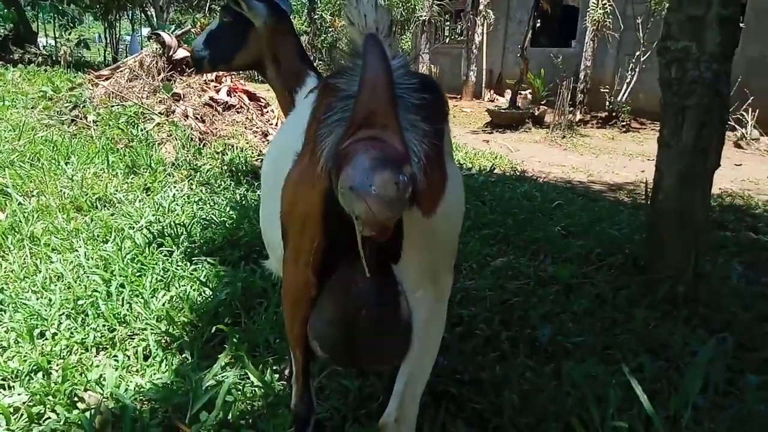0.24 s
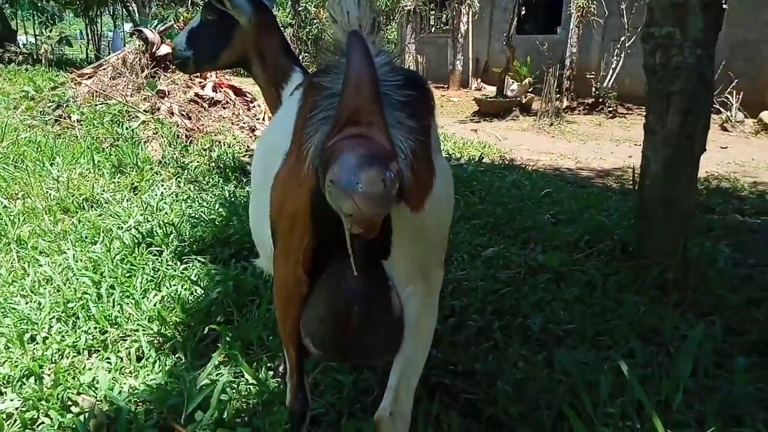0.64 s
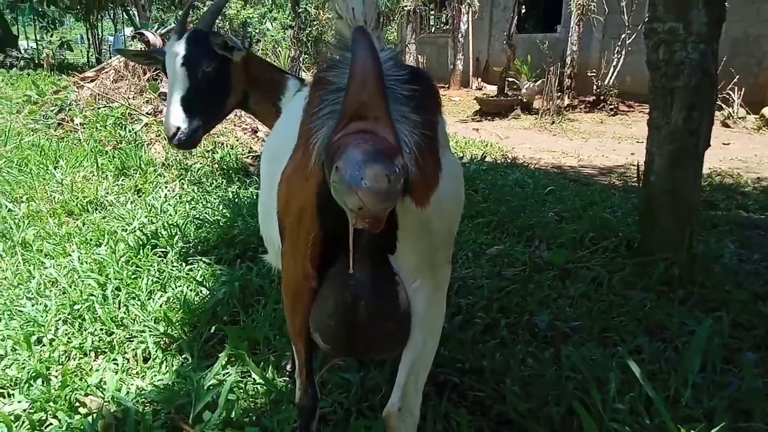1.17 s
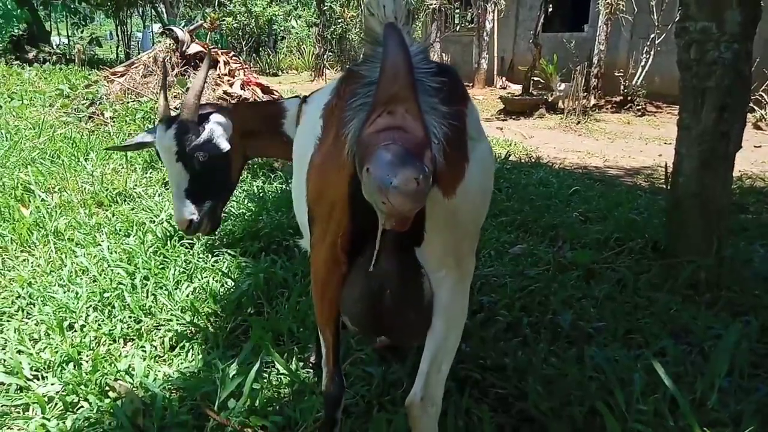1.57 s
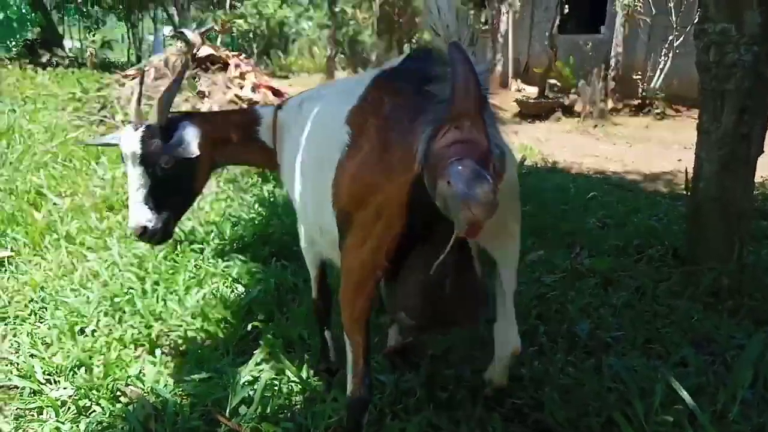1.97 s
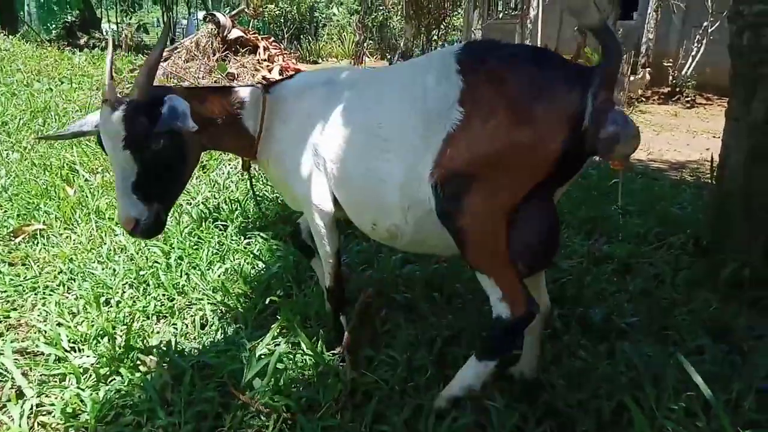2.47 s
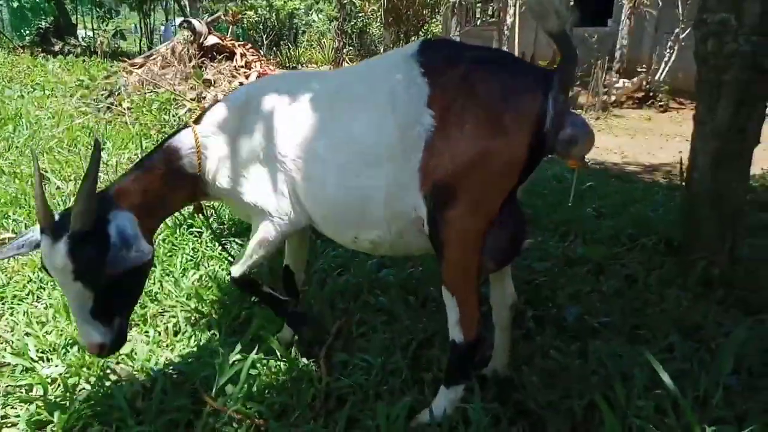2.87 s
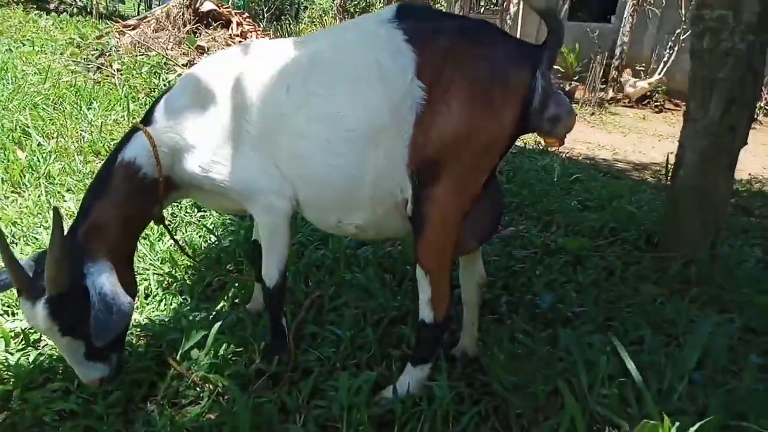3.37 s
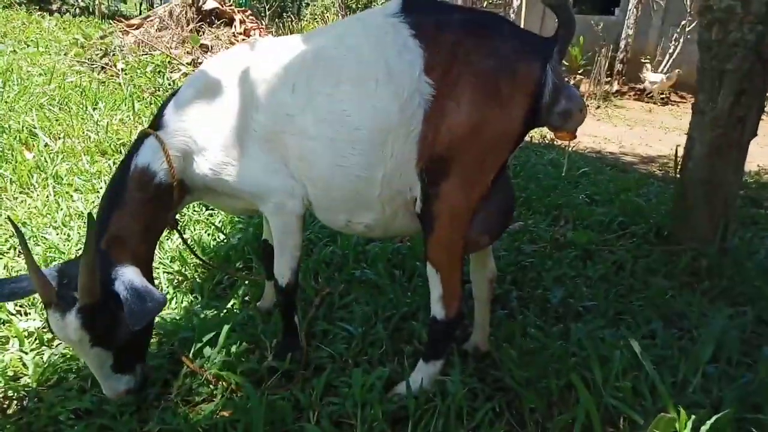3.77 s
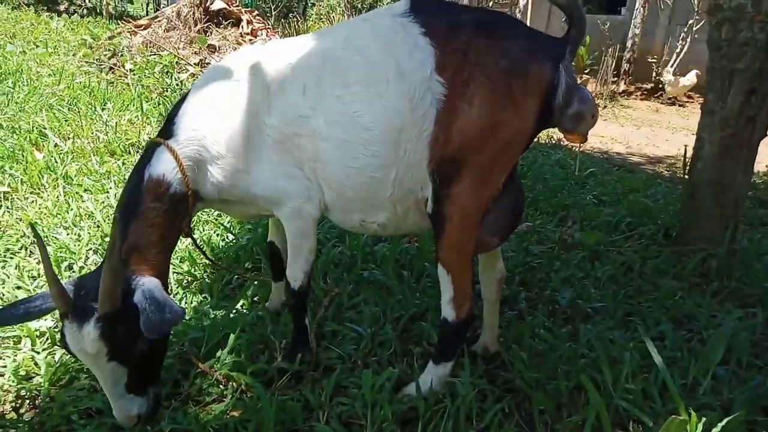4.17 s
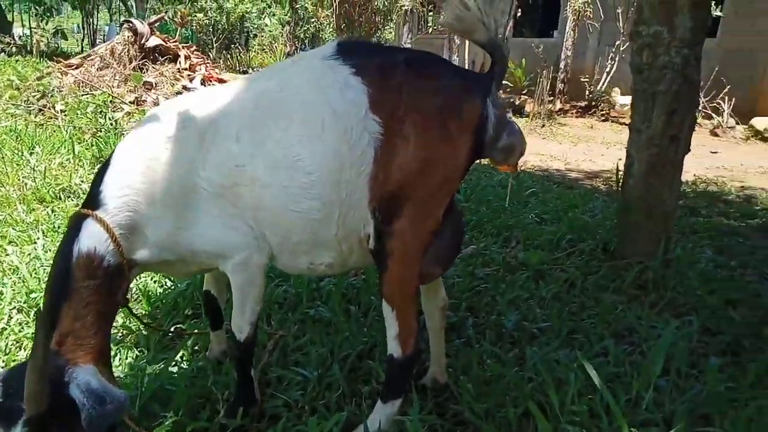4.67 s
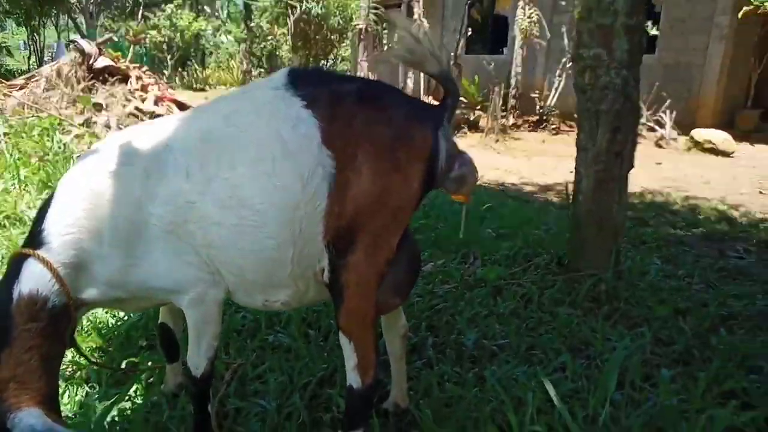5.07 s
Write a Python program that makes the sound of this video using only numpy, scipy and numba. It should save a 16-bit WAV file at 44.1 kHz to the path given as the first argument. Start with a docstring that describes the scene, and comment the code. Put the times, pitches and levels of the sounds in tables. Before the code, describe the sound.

Close to the microphone, a goat bleats loudly open-mouthed, later more muffled and nasal, amid small birdsong and light rustling grass.

```python
"""A soft outdoor rush opens the scene, in a grassy yard with trees; shaped noise and a faint sine drone.
Turf thuds and grass swishes, swells of shaped noise, come as a goat steps and noses about.
Small birds whistle in gliding sines, heard mostly as scatter from the trees.
The goat bleats twice: first with its mouth wide open, then starting from a nasal hum. Pulses and
turbulence drive its throat in about ten throbs a second, with the voice sagging and rasping between."""
import sys
import numpy as np
from scipy import signal
from scipy.fft import rfft, irfft, next_fast_len
from scipy.io import wavfile
from scipy.ndimage import uniform_filter1d, map_coordinates
from numba import njit

SR = 44100
rng = np.random.default_rng(int(sys.argv[2]) if len(sys.argv) > 2 else 0)


def store_pcm(level_fs):
    """Save levels as 16-bit WAV."""
    pcm = np.round(np.clip(level_fs, -1, 1) * 32767).astype(np.int16)
    wavfile.write(sys.argv[1], SR, np.atleast_2d(pcm).T)


N = 235405  # length [samples]


def amp(db):
    """Decibels to an amplitude factor."""
    return 10 ** (np.asarray(db) / 20)


def unit(x):
    """x scaled to rms 1."""
    return x / np.sqrt(np.mean(x ** 2) + 1e-20)


def clock():
    """The time of every sample [s]."""
    return np.arange(N) / SR


def curves(rows):
    """One value per sample for each column after the time."""
    times, *columns = np.transpose(rows)
    times = np.maximum.accumulate(times)
    return [np.interp(clock(), times, column) for column in columns]


def smooth(x, seconds):
    """A rounded running mean: two box averages in a row."""
    size = max(int(seconds * SR), 1)
    return uniform_filter1d(uniform_filter1d(x, size), size)


def wobble(rate):
    """A smooth random curve, rate knots a second."""
    t = np.arange(0, N + 16, 16) / SR
    knots = rng.standard_normal(int(N * rate / SR) + 4)
    return np.interp(clock(), t, map_coordinates(knots, [t * rate]))


def coloured(x, points):
    """x through a spectrum of (frequency [Hz], gain [dB]) points, joined on a log frequency axis."""
    size = next_fast_len(N + 8192)
    hz, db = np.transpose(points)
    log_bins = np.log(np.fft.rfftfreq(size, 1 / SR) + 1)
    gain = amp(np.interp(log_bins, np.log(hz), db))
    return irfft(rfft(x, size) * gain, size)[:N]


def noise(points):
    """Coloured noise of rms 1."""
    return unit(coloured(rng.standard_normal(N), points))


def swell(s, rise, fall):
    """A bell-shaped swell that peaks at 1 at time s."""
    i = np.arange(max(int((s - 5 * rise) * SR), 0), min(int((s + 5 * fall) * SR), N))
    t = i / SR - s
    bell = np.zeros(N)
    bell[i] = np.exp(-.5 * (t / np.where(t < 0, rise, fall)) ** 2)
    return bell


@njit
def two_pole(x, tuning, damping):
    """A band-pass whose tuning and damping move sample by sample."""
    y, a, b = np.zeros(len(x)), 0., 0.
    for i in range(len(x)):
        g = tuning[i]
        band = (a + g * (x[i] - b)) / (1 + g * (g + damping[i]))
        a, b = 2 * band - a, b + 2 * g * band
        y[i] = band * damping[i]
    return y


def formant(x, hz, width):
    """One resonance, with gain 1 at its centre."""
    centre = hz * np.ones(N)
    return two_pole(x, np.tan(np.pi * centre / SR), width / centre)


def hollow(x, hz, width, depth):
    """An antiresonance: a side cavity swallows one band."""
    return x - np.clip(depth, 0, 1) * formant(x, hz, width)


def echoes(x, t60):
    """Diffuse scatter from walls and trees: a decaying noise tail of unit energy."""
    t = np.arange(SR) / SR
    tail = rng.standard_normal(SR) * amp(-60 * t / t60) * (1 - np.exp(-t / 0.0049))
    return signal.fftconvolve(x, tail / np.linalg.norm(tail))[:N]


def between(pair, share):
    """From the first value of a pair to the second."""
    return pair[0] + share * (pair[1] - pair[0])


# spectrum of the outdoor rush: (frequency [Hz], relative level [dB])
RUSH_SPECTRUM = [(200, -4.5), (450, -12.5), (620, -9.5), (900, -1), (1800, 1), (2900, -3.5), (3900, -4),
                 (4550, -13), (5100, -26.5), (7500, -27), (9500, -40.5), (15000, -53)]
# spectrum of the low air: (frequency [Hz], relative level [dB])
MURMUR_SPECTRUM = [(22, -41), (45, -16.5), (75, -3.5), (130, -0.5), (260, -0.5), (320, -4.5), (420, -18.5),
                   (1500, -72.5)]
# faint drone, before its wavering: (time [s], level [dB])
DRONE_LEVEL = [(0, -65), (.6, -52.5), (1.0, -52.5), (2.3, -56.5), (2.7, -59), (3.3, -56), (4.0, -66.5),
               (5.34, -60)]
RUSH_DB, MURMUR_DB = -53.5, -55  # middle levels of the outdoor air


def surroundings():
    """All around the microphone: a rush, a murmur of air and a mid band in noise, and a wavering sine drone."""
    rush = amp(RUSH_DB + 0.39 * wobble(2.3)) * noise(RUSH_SPECTRUM)
    murmur = amp(MURMUR_DB + 2.2 * wobble(5.7)) * noise(MURMUR_SPECTRUM)
    drone_hz = 100 + 5 * wobble(9.1)
    drone_level = amp(curves(DRONE_LEVEL)[0] + 2.8 * wobble(3.7))
    drone = drone_level * np.sin(2 * np.pi * np.cumsum(drone_hz) / SR)
    middle_level = amp(-66.5 + 2.5 * wobble(4.2))  # comes and goes
    middle = middle_level * noise([(400, -40.5), (600, 5), (850, 5.0), (1200, -35.5)])
    return rush + middle + murmur + drone


# swishes of grass: (time [s], half length [s], stem level [dB], crisp blades over the stems [dB])
GRASS_SWISHES = [(0.471, 0.011, -57.5, 6.5), (0.528, .13, -55.5, -5), (2.265, 0.0023, -47, -25),
                 (2.339, 0.27, -51.5, -7.5), (2.832, 0.0025, -46, -10), (3.09, 0.064, -80, 17),
                 (3.525, 0.041, -53, -15), (3.747, 0.023, -63.5, 0), (4.79, 0.039, -44.5, -17),
                 (5.166, 0.052, -48, -29)]
# spectrum of the stems: (frequency [Hz], relative level [dB])
STEM_SPECTRUM = [(100, -17), (500, 2), (900, 1.5), (3000, 4), (4300, -2), (5500, -38), (15000, -47.5)]
# spectrum of the dry blades: (frequency [Hz], relative level [dB])
BLADE_SPECTRUM = [(1000, -25), (4000, 7.5), (6500, 3.5), (9000, -10.5), (11000, -19), (15000, -11)]
# soft thuds on the turf: (time [s], half length [s], level [dB])
TURF_THUDS = [(0.137, 0.014, -47), (0.477, 0.054, -50), (1.149, 0.012, -46), (1.428, 0.014, -45.5),
              (3.058, 0.041, -45), (3.525, 0.015, -51), (4.08, 0.023, -50)]
# spectrum of the turf: (frequency [Hz], relative level [dB])
TURF_SPECTRUM = [(25, -11), (70, 16.5), (170, 4.5), (280, -10), (450, -40), (2000, -58.5)]


def grass(grain_db=3):
    """At ground level: stems swish, dry blades crackle in grainy noise, and the turf thuds softly."""
    stems = sum(amp(db) * swell(s, half, half) for s, half, db, _ in GRASS_SWISHES)
    blades = sum(amp(db + crisp_db) * swell(s, half, half) for s, half, db, crisp_db in GRASS_SWISHES)
    thuds = sum(amp(db) * swell(s, half, half) for s, half, db in TURF_THUDS)
    swish = stems * noise(STEM_SPECTRUM)
    crackle = blades * unit(noise(BLADE_SPECTRUM) * amp(grain_db * wobble(400)))
    return swish + crackle + thuds * noise(TURF_SPECTRUM)


# a songbird's repeated phrase, before scatter:
# (time into the phrase [s], length [s], start [Hz], end [Hz], relative level [dB])
BIRD_PHRASE = [(0, 0.089, 3892, 4010, -49), (0.064, 0.07, 3616, 3720, -46), (0.104, .08, 4680, 5030, -52),
               (.165, .085, 6100, 6653, -61)]
# single whistles, before scatter: (time [s], length [s], start [Hz], end [Hz], relative level [dB])
BIRD_WHISTLES = [(.634, 0.082, 6400, 6240, -62), (2.35, .06, 3480, 2953, -46),
                 (2.721, 0.059, 4510, 4550, -51.5), (2.779, 0.16, 4990, 5170, -53.5),
                 (2.992, 0.19, 7150, 6560, -56.5), (3.203, 0.22, 4460, 5450, -58.5),
                 (3.37, 0.074, 5710, 6830, -54), (3.725, 0.034, 7455, 4477, -46.5),
                 (4.927, .14, 1688, 1750, -48.5), (5.107, 0.16, 1828, 1973, -46)]
PHRASE_START_S, PHRASE_EVERY_S = 3.485, .292
PHRASE_FADE_DB = 0.86  # each repeat is set a little fainter


def bird_notes(count=6):
    """The single whistles, and the phrase repeated at an even pace."""
    notes = list(BIRD_WHISTLES)
    for k in range(count):
        start = PHRASE_START_S + k * PHRASE_EVERY_S
        for s, length, start_hz, end_hz, db in BIRD_PHRASE:
            notes.append((start + s, length, start_hz, end_hz, db - k * PHRASE_FADE_DB))
    return notes


def birds(waver=0.0095):
    """Up in the trees: thin trembling whistles, gliding sines heard mostly as scatter."""
    song, drift = np.zeros(N), 1 + waver * wobble(420)
    for s, length, start_hz, end_hz, db in bird_notes():
        i = np.arange(int(s * SR), min(int((s + length) * SR), N))
        u = np.linspace(0, 1, len(i))
        hz = (start_hz + (end_hz - start_hz) * np.sin(np.pi / 2 * u)) * drift[i]
        # no two notes are quite alike, in pitch or level
        hz = hz * (1 + .005 * rng.standard_normal())
        level = amp(db + 1.5 * rng.standard_normal())
        envelope = np.sqrt(np.abs(np.sin(np.pi * u)))
        song[i] += level * envelope * np.sin(2 * np.pi * np.cumsum(hz) / SR)
    song *= 1 + 0.71 * wobble(560)  # a fast flutter widens each note
    # distance dulls the highest notes
    song = coloured(song, [(1800, 0.28), (4000, -0.017), (5000, -0.51), (7000, -1.5)])
    return 0.76 * song + 0.95 * echoes(song, t60=0.15) + 0.75 * echoes(song, t60=0.79)


# closed-mouth grunts at the edges of the bleats: (time [s], half length [s], pitch [Hz], rms level [dB])
NASAL_GRUNTS = [(2.076, 0.0065, 230, -40), (4.043, 0.0067, 189, -39), (4.561, 0.0067, 228, -29.5)]


def grunts():
    """With the lips shut, little more than the fundamental gets out through the nose: swelling sines."""
    total = np.zeros(N)
    for s, half, hz, db in NASAL_GRUNTS:
        tone = np.sqrt(2) * np.sin(2 * np.pi * hz * (clock() - s))
        total += amp(db) * swell(s, half, half) * tone
    return total


# courses of the wide-open bleat and of the one that starts as a nasal hum: (time [s], pitch before bends [Hz],
# first formant as the mouth opens [Hz], level held between throbs, before catches [dB])
WIDE_COURSE = [(1.298, 220, 285, -47.5), (1.355, 283, 381, -32), (1.385, 297.5, 502, -54.5),
               (1.43, 304.3, 615, -33), (1.475, 322.1, 689.8, -29.5), (1.57, 309.5, 846.2, -29.5),
               (1.73, 317.8, 822, -24), (1.84, 298.6, 860, -28), (1.93, 294.6, 843.3, -25.5),
               (2.0, 268.6, 740, -30), (2.07, 233, 684, -46.5)]
HUM_COURSE = [(4.072, 204.7, 227, -46), (4.125, 243.7, 278, -44), (4.201, 283.7, 311, -44.5),
              (4.299, 299.1, 329.6, -27), (4.329, 296.7, 572.8, -38.5), (4.388, 286.6, 598, -45),
              (4.489, 278, 639.4, -24.5), (4.547, 282.6, 613.4, -38.5)]
EDGE_DB_PER_S = 1299  # how fast the held voice starts and stops


def course():
    """Pitch, first formant and held level; the held voice dies away outside each bleat."""
    pitch, first_hz, held_db = curves(WIDE_COURSE + HUM_COURSE)
    t = clock()
    distances = [np.abs(t - np.clip(t, rows[0][0], rows[-1][0])) for rows in (WIDE_COURSE, HUM_COURSE)]
    outside = np.min(distances, axis=0)  # time to the nearer bleat [s]
    return pitch, first_hz, amp(held_db - EDGE_DB_PER_S * outside)


def opening(first_hz):
    """How wide the mouth is, 0-1, told from the first formant."""
    return np.clip((first_hz - 600) / 220, 0, 1)


# throbs of both bleats: (peak time [s], peak level [dB], rise [s], lead of the pitch crest [s],
# base roughness [0-1], upper formants, before brightness [dB], nasal ring, before brightness [dB])
BLEAT_THROBS = [(1.334, -32, 0.016, 0.041, .14, -10, -13.5), (1.464, -22, 0.013, 0.054, 0.19, -6.5, -11),
                (1.553, -12.5, 0.016, 0.036, 0.55, -3, 6), (1.644, -11.5, 0.017, .031, 0.18, -9, 0),
                (1.74, -13.5, 0.016, 0.03, 0.34, -4, 1.5), (1.836, -14.5, .014, 0.028, 0.17, 0.5, -7.5),
                (1.922, -22.5, 0.014, 0.035, 0.31, 3, -5.5), (4.103, -25, 0.008, 0.026, .2, -21, -22),
                (4.21, -22.5, 0.019, .039, 0.22, -16, -15), (4.303, -26, 0.015, .043, 0.39, -19.5, -16.5),
                (4.398, -15.5, 0.019, .042, 0.57, -11.5, -12), (4.501, -19, 0.019, 0.037, 0.31, -12.5, -17)]
FALL_S, RELEASE_S, SAG_S = 0.0098, .019, 0.037  # after a throb's peak: decay, pitch lifts, pitch lowest
PRESS_S = .023  # from the pitch crest down to the pressed tone
RELEASE_LIFT = .025  # share of the pitch
CREST_LIFT, SAG_DROP = (0.11, .06), (0.00564, .15)  # shares of the pitch: (lips close, mouth wide)
CATCH_S, CATCH_DB = 0.023, 8  # the held voice catches just after a throb: delay, depth of the dip


def larynx():
    """Pitch, roughness and strength: each throb crests, settles under pressure, lets go and sags into a rasp."""
    pitch, first_hz, held = course()
    knots, push = [], np.zeros(N)
    for s, db, rise, lead, rough, _, _ in BLEAT_THROBS:
        push += amp(db) * swell(s, rise, FALL_S)
        held = held * amp(-CATCH_DB * swell(s + CATCH_S, 0.0024, 0.005))
        wide = opening(first_hz[int((s + SAG_S) * SR)])
        crest, sag = between(CREST_LIFT, wide), -between(SAG_DROP, wide)
        # (time [s], pitch bend [share], roughness)
        knots += [
            (s - lead - .008, crest, 0.87 * rough),
            (s - lead, crest, 0.17 * rough),
            (s - lead + PRESS_S, 0, 0.11 * rough),
            (s + 0.00718, 0.51 * RELEASE_LIFT, rough),
            (s + RELEASE_S, RELEASE_LIFT, 2.5 * rough),
            (s + SAG_S - .006, .85 * sag, rough),
            (s + SAG_S + 0.0027, sag, 1.41 * rough)]
    bend, rough = curves(knots)
    rough = rough + 0.43 * swell(WIDE_COURSE[-1][0], 0.092, 0.051)  # the long bleat runs out in a rasp
    return smooth(pitch * (1 + bend), 0.0017), np.clip(rough, 0, 1), np.hypot(push, held)


def folds(pitch, rough, jitter=0.01956, rasp=0.97, shimmer_db=2):
    """One pulse per cycle; rough folds no longer snap shut: the sharp edge gives way to turbulence."""
    phase = 2 * np.pi * np.cumsum(pitch * (1 + jitter * rough * wobble(330))) / SR
    order = 50  # harmonics in the pulse
    pulses = unit(np.sin((order + .5) * phase) / (2 * np.sin(phase / 2) + 1e-12) - .5)
    edge = coloured(pulses, [(900, -47.0), (1700, -32.5), (3000, 7.5)])
    pulses = pulses - np.clip(0.43 * rough, 0, 1) * edge
    breath = noise([(100, -13.5), (500, 4.0), (1200, -2.5), (3000, 6.0), (15000, -10.0)])
    turbulence = unit((1 + 1.75 * np.cos(phase)) * breath)
    return pulses * amp(shimmer_db * rough * wobble(290)) + rasp * rough * turbulence


def smear(x):
    """Reflections inside the throat delay some bands, which spreads each pulse over its cycle."""
    for hz, width in [(1500, 370), (2700, 460), (3900, 230)]:
        x = x - 2 * formant(x, hz, width)
    return x


# slow drift of the throat: (time [s], second formant [Hz], nasal ring [Hz], brightness [dB],
# hiss level at full voice strength [dB])
THROAT_DRIFT = [(1.33, 883, 3480, -1.5, -51), (1.45, 1780, 3710, -1.5, -43), (1.63, 1800, 3800, 2, -37.5),
                (1.76, 1670, 3830, 0, -42), (1.86, 1600, 4020, 4, -42), (2.05, 1490, 3660, -8.5, -51),
                (4.1, 1408, 3630, -6, -48.5), (4.18, 1311, 3602, 1, -41), (4.29, 1380, 3707, 3.5, -40.5),
                (4.37, 1575, 3640, -0.5, -46), (4.55, 1474, 3650, 4.5, -41.5)]
SLACK_UPPER_DB, SLACK_RING_DB = (0, -2), (4, -2.5)  # between throbs: (lips close, mouth wide)
PRESS_RISE, PRESS_FALL_S = 1.06, 0.012  # spread of a throb's colour: before (times its rise), after the peak
BURST_S, BURST_DB = 0.039, 12  # with the lips close, letting go brightens a fully rough throb this much
SECOND_OVER_DB, SECOND_WIDE_DB = 5.5, -9.5  # second formant: over the upper ones, lips close; mouth wide


def mouth():
    """Formant tunings and levels: each throb presses its colour onto the slack voice, brightening on release."""
    first_hz = course()[1]
    wide = opening(first_hz)
    second_hz, ring_hz, bright_db, _ = curves(THROAT_DRIFT)
    presses = [swell(s, PRESS_RISE * rise, PRESS_FALL_S) for s, _, rise, *_ in BLEAT_THROBS]
    press = np.max(presses, axis=0)
    burst = sum(rough * swell(s + BURST_S, 0.013, 0.0044) for s, _, _, _, rough, *_ in BLEAT_THROBS)
    burst_db = BURST_DB * (1 - wide) * burst
    pressed_upper_db, pressed_ring_db = curves(BLEAT_THROBS)[-2:]
    upper_db = bright_db + burst_db + between((between(SLACK_UPPER_DB, wide), pressed_upper_db), press)
    ring_db = bright_db + between((between(SLACK_RING_DB, wide), pressed_ring_db), press)
    second_db = between((upper_db + SECOND_OVER_DB, SECOND_WIDE_DB), wide)
    return first_hz, second_hz, ring_hz, second_db, upper_db, ring_db


# upper formants: (frequency [Hz], width [Hz], relative level, lips close [dB], relative level, mouth wide [dB])
UPPER_FORMANTS = [(2042, 246, -17.5, -5.5), (2609, 278, -0.5, -2.5), (2874, 410, -6, -5.5),
                  (4150, 230, -16, -9)]
# radiation from the head: (frequency [Hz], gain [dB])
HEAD_RADIATION = [(60, -36), (250, 6), (400, -8), (600, 0.5), (4400, 2.5), (5100, -12.5), (7200, -23.5),
                  (8000, -12.5), (10000, -47.5), (12500, -43.5), (15000, -53)]
# turbulence at the teeth and nostrils: (frequency [Hz], relative level [dB])
HISS_SPECTRUM = [(2500, -37.5), (4800, -4), (7000, -9.5), (7900, -19), (10000, -29), (11200, -26.5),
                 (12500, -30.5), (15300, -21)]
HISS_GROWTH = 0.44  # dB of hiss per dB of voice
YARD_DB, YARD_T60_S = -12, .16  # the yard's short answer to the voice


def goat():
    """The folds drive the throat; the first formant climbs as the mouth opens, the nose takes over as it shuts."""
    pitch, rough, strength = larynx()
    first_hz, second_hz, ring_hz, second_db, upper_db, ring_db = mouth()
    wide = opening(first_hz)
    shut = np.clip((560 - first_hz) / 220, 0, 1)
    source = smear(folds(pitch, rough))
    voice = formant(source, first_hz, first_hz / 7)
    voice -= amp(second_db) * formant(source, second_hz, 160)
    # a fixed resonance of the pharynx, let out by the open mouth
    voice += amp(-13.5) * (.2 + .8 * wide) * formant(source, 870, 110)
    for k, (hz, width, close_db, wide_db) in enumerate(UPPER_FORMANTS):
        level = amp(upper_db + between((close_db, wide_db), wide))
        voice += (-1) ** (k + 1) * level * formant(source, hz, width)  # signs alternate
    voice += amp(ring_db) * formant(source, ring_hz, 200)
    voice = hollow(voice, hz=2020, width=260, depth=.65 * (1 - wide))
    voice = hollow(voice, hz=970, width=500, depth=.7 * shut)
    voice = hollow(voice, hz=1102, width=440, depth=0.51 * (1 - shut))
    voice = coloured(voice, HEAD_RADIATION)
    # level the voice, then give it the strength of the throbs
    voice *= strength / np.sqrt(np.abs(smooth(voice ** 2, 0.0037)) + 1e-12)
    # the fluttering hiss follows the airflow, which swings less than the voice
    airflow = amp(curves(THROAT_DRIFT)[-1]) * strength ** HISS_GROWTH
    voice += airflow * (1 + 0.3 * wobble(300)) * noise(HISS_SPECTRUM)
    return voice + amp(YARD_DB) * echoes(voice, t60=YARD_T60_S)


def scene():
    """The yard, the grass, the birds and the goat at one microphone."""
    return (surroundings() + grass() + birds() + grunts() + goat())[None]


def record(dry):
    """The microphone's channel keeps nothing above its band limit."""
    top_hz = 15620
    size = next_fast_len(N + 8192)
    passed = np.fft.rfftfreq(size, 1 / SR) < top_hz
    return irfft(rfft(dry, size) * passed, size)[..., :N]


dry = scene()
out = record(dry)
store_pcm(out)
```